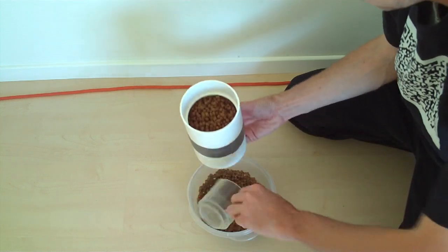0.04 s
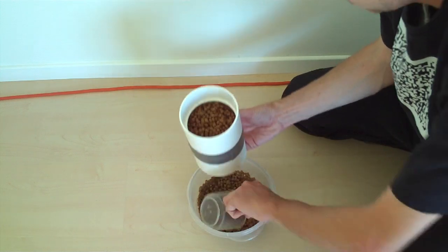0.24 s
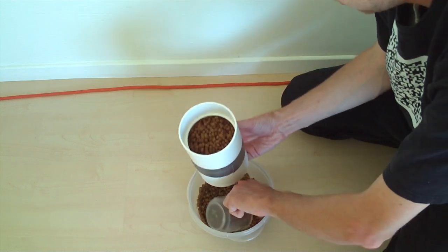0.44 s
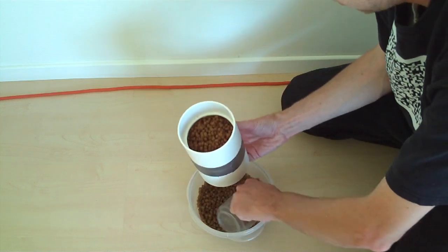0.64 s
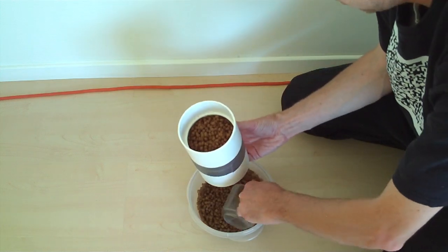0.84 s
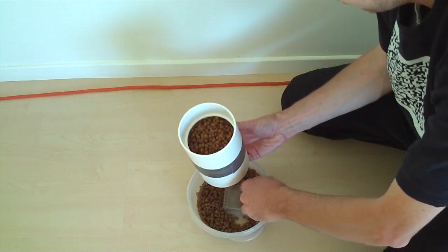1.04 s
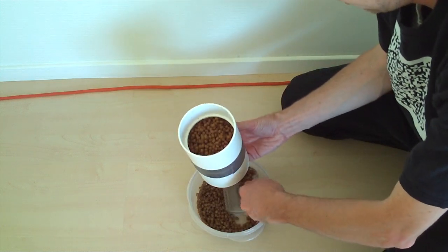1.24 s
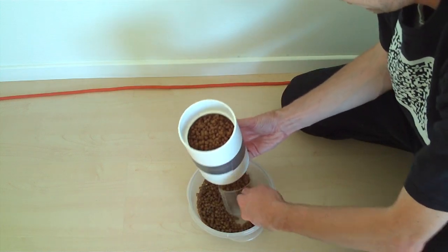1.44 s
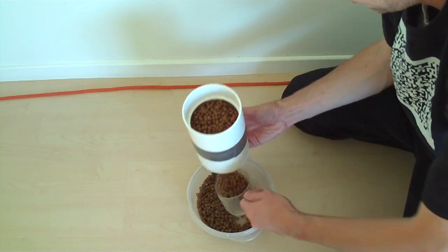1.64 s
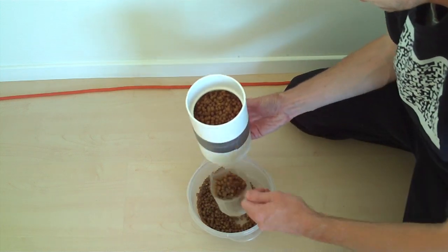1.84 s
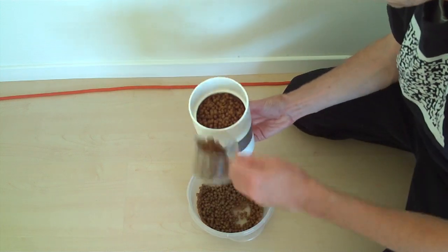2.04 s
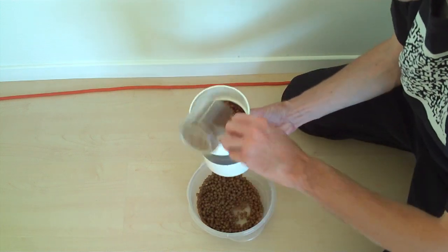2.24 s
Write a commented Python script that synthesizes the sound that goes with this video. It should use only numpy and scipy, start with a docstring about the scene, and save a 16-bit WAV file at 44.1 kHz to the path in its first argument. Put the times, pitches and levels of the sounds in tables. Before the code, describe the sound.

Dry kibble crunches and rattles as a plastic cup scoops through a plastic tub.

```python
"""Scooping dry kibble

A plastic cup knocks into a tub of kibble, digs through it in uneven pushes and is lifted out full.
Pellets crunch against each other and ring the wall modes of tub and cup, in a bare, live room.
The microphone adds a few dull low pops and has little treble."""
import sys
import numpy as np
from scipy import signal
from scipy.fft import rfft, irfft
from scipy.io import wavfile
from scipy.ndimage import map_coordinates

SR = 44100
rng = np.random.default_rng(int(sys.argv[2]) if len(sys.argv) > 2 else 0)


def file_out(sig):
    """Save sig as 16-bit WAV at sys.argv[1]."""
    # one column per channel
    cols = np.atleast_2d(sig).T
    # limit, then scale
    lim = np.clip(cols, -1, 1)
    pcm = np.round(lim * 32767).astype(np.int16)
    wavfile.write(sys.argv[1], SR, pcm)


N = 101429

# tub wall modes: f/Hz, level/dB, t60/s
TUB_MODES = [(322, -17, 0.25), (466, -4.5, 0.035), (513, -9, 0.11), (562, 1.5, 0.072), (635, -4.5, 0.061),
             (661, -2, 0.086), (730, -8.5, 0.049), (1120, -15, 0.049)]
# cup wall modes: f/Hz, level/dB, t60/s
CUP_MODES = [(806, -8.5, 0.054), (890.3, -4.5, 0.064), (995, 0, 0.027), (1114, -4, 0.039),
             (1357, -4, 0.021), (1368, -1.5, 0.047), (1483, -8.5, 0.021), (1830, -12, 0.0092),
             (2180, -14.5, 0.014)]
# pushes of the dig: t/s, tub rattle/dB, cup rattle/dB, crunch/dB, fine ticks/dB
DIG_LEVELS = [(0.0, -66, -62, -59.5, -50.5), (0.1, -66, -62, -70.5, -66), (0.207, -77.5, -58.5, -76, -79),
              (0.217, -62, -46, -41.5, -47.5), (0.255, -45.5, -42, -38, -55), (0.29, -76, -46, -45, -54.5),
              (0.345, -72, -44, -53, -54.5), (0.371, -42.5, -47.5, -35, -40.5),
              (0.399, -32.5, -31, -36, -43), (0.461, -36.5, -42.5, -38.5, -41.5),
              (0.51, -46, -40.5, -42.5, -47.5), (0.678, -47, -40, -39.5, -50.5),
              (0.719, -36.5, -36.5, -37.5, -41), (0.80, -38.5, -38, -36.5, -46.5),
              (0.869, -54, -37, -40.5, -49.5), (0.895, -34, -30.5, -34.5, -40), (0.945, -51, -44, -41, -48),
              (1.057, -40, -37, -40, -47.5), (1.074, -35.5, -27.5, -37.5, -37),
              (1.105, -57, -31.5, -37, -43.5), (1.16, -57, -37, -36, -47), (1.32, -48.5, -39, -48, -45),
              (1.43, -55.5, -48, -41.5, -50), (1.529, -51.5, -40, -36.5, -46),
              (1.61, -59, -43.5, -39.5, -46.5), (1.739, -50, -40, -44.5, -51.5),
              (1.755, -46, -35, -46.5, -44.5), (1.861, -52.5, -45.5, -47, -49), (1.97, -52, -41, -50, -53),
              (2.08, -81, -52.5, -67, -57), (2.3, -64, -54, -75, -57)]
def digging(t):
    """The push of the cup sets how hard the pellets rattle and crunch."""
    times, *levels_db = np.array(DIG_LEVELS).T
    tub, cup, crunch, ticks = (undb(np.interp(t, times, db, left=-120)) for db in levels_db)
    return (tub * rattle(TUB_MODES) + cup * rattle(CUP_MODES)
            + crunch * pellets(centre_hz=2123, spread_oct=0.72, t60_cycles=23.3, per_s=2400, scatter_db=2.5)
            + ticks * pellets(centre_hz=4027, spread_oct=0.52, t60_cycles=25, per_s=3200, scatter_db=1.0))


def rattle(modes):
    """Pellets hit a plastic wall; each lands elsewhere and rings its modes in another mix."""
    hits = contacts(per_s=1000, scatter_db=3.5)
    out = np.zeros(N)
    for hz, db, t60_s in modes:
        drive = hits * (2 * rng.random(N) - 1)
        out += undb(db) * unit(signal.fftconvolve(drive, ring(hz, t60_s))[:N])
    return unit(out)


def pellets(centre_hz, spread_oct, t60_cycles, per_s, scatter_db, sizes=16):
    """Pellets of many sizes click together, each size ringing briefly at its own pitch."""
    out = np.zeros(N)
    for offset in np.linspace(-1, 1, sizes):
        hz = centre_hz * 2 ** (offset * spread_oct)
        hits = contacts(per_s / sizes, scatter_db) * rng.choice([-1, 1], N)
        clicks = signal.fftconvolve(hits, ring(hz, t60_cycles / hz))[:N]
        out += undb(-3 * offset ** 2) * clicks
    return unit(out)


def contacts(per_s, scatter_db):
    """Random pellet contacts: many weak, a few strong."""
    strength = undb(scatter_db * np.minimum(rng.exponential(size=N), 4))
    return (rng.random(N) < per_s / SR) * strength


# empty cup modes: f/Hz, level/dB, t60/s
EMPTY_CUP_MODES = [(242, -17, 0.08), (307, -7.5, 0.065), (510, -14.5, .06), (572.4, -1, 0.12),
                   (649, -6.5, 0.089), (681, 1, 0.08), (721, -12, 0.19), (1080, -12, 0.12),
                   (1380, -24, 0.06)]
# cup on the heap: t/s, ring/dB, crack/dB
CUP_LANDINGS = [(0.212, -24, -23), (0.233, -16.5, -41)]
def landing(t):
    """The empty cup lands on the heap with a hollow ring and bounces."""
    out = np.zeros(N)
    hollow = struck(EMPTY_CUP_MODES, mode_ratio=0.97)
    for at_s, ring_db, crack_db in CUP_LANDINGS:
        add(out, at_s, undb(ring_db) * hollow + undb(crack_db) * crack(t, top_hz=1300, order=4))
    return out


# cup against tub: t/s, tub ring/dB, cup ring/dB, crack/dB
TUB_KNOCKS = [(0.451, -24.5, -25, -35), (0.5927, -25.5, -31.5, -40), (0.727, -21.5, -29, -34),
              (0.889, -26.5, -23.5, -33.5), (0.9076, -32.5, -25.5, -29.5), (0.9207, -39.5, -30, -35),
              (1.076, -29, -27, -26), (1.535, -29, -27.5, -28.5), (1.609, -46.5, -24, -30),
              (1.6458, -28, -20.5, -30), (1.744, -37, -23, -31), (1.755, -34, -20, -42),
              (1.797, -32, -26, -35), (1.856, -31.5, -28.5, -37), (1.891, -44, -25.5, -36)]
def knocks(t):
    """The buried cup strikes the tub; both ring."""
    out = np.zeros(N)
    cup = struck(CUP_MODES, mode_ratio=-1.12)
    tub = filt(struck(TUB_MODES, mode_ratio=0.78), 310, "high")
    for at_s, tub_db, cup_db, crack_db in TUB_KNOCKS:
        add(out, at_s, undb(tub_db) * tub + undb(cup_db) * cup + undb(crack_db) * crack(t, top_hz=2200))
    return out


def struck(modes, mode_ratio, contact_s=0.001):
    """A padded blow to a plastic wall, peak 1; a negative ratio swings adjacent modes in opposition."""
    wall = sum(mode_ratio ** k * undb(db) * ring(hz, t60_s) for k, (hz, db, t60_s) in enumerate(modes))
    wall *= 1 - np.exp(-np.arange(len(wall)) / SR / contact_s)
    return wall / abs(wall).max()


def crack(t, top_hz, order=2, decay_s=0.0032):
    """A short noisy contact, without bass."""
    decay = np.exp(-t[:SR // 4] / decay_s)
    return unit(filt(rng.standard_normal(len(decay)), [220, top_hz], "band", order)) * decay


# pellet snaps: t/s, f/Hz, level/dB
PELLET_SNAPS = [(0.3305, 2280, -33), (0.3719, 1590, -28.5), (0.4088, 1550, -23), (0.434, 1640, -25.5),
                (0.5754, 1490, -26.5), (0.624, 1370, -31), (0.8603, 1520, -25), (0.8934, 1560, -21),
                (0.942, 1550, -28), (0.984, 1480, -28.5), (1.037, 1450, -26.5), (1.131, 1241, -29.5),
                (1.1562, 1320, -22), (1.21, 3803, -23), (1.225, 3800, -38), (1.2499, 1843, -27),
                (1.326, 3940, -35.5), (1.378, 2060, -21.5), (1.403, 2050, -29), (1.465, 2040, -24),
                (1.587, 2310, -21.5), (1.7459, 1390, -26), (1.7806, 1570, -21), (1.8918, 1450, -23),
                (2.0078, 1420, -29.5), (2.05, 1560, -32.5), (2.0751, 1430, -30), (2.101, 5620, -39),
                (2.227, 4020, -40)]
def snaps(t):
    """Single pellets snap against the cup."""
    out = np.zeros(N)
    for at_s, hz, db in PELLET_SNAPS:
        snap = ring(hz, t60_s=0.013) + undb(-16) * crack(t, top_hz=4900)
        add(out, at_s, undb(db) * snap)
    return out


# cup jams: t/s, f/Hz, level/dB, t60/s
JAM_THUMPS = [(0.2125, 935, -25.5, 0.032), (0.392, 556, -31, 0.061), (0.5923, 538, -17, 0.021),
              (0.893, 468, -28, 0.087), (1.08, 552, -24.5, 0.056)]
def thumps():
    """The cup jams against kibble; the tighter the packing, the sooner it damps the plastic."""
    out = np.zeros(N)
    for at_s, hz, db, t60_s in JAM_THUMPS:
        add(out, at_s, undb(db) * ring(hz, t60_s))
    return out


# tub note under load: t/s, f/Hz, level/dB
TUB_GLIDE = [(0.38, 561.5, -57.5), (0.452, 535, -54.5), (0.569, 501, -56.5), (0.62, 495.9, -46.5),
             (0.68, 492.4, -37.5), (0.778, 476.8, -45), (0.849, 477, -55.5), (0.89, 463.3, -49.5),
             (0.94, 448, -61), (1.08, 435.7, -46), (1.13, 423, -69)]
def pressed_tub(t):
    """Pellets drum on the tub floor, whose note sinks as the cup presses deeper."""
    times, hz, db = np.array(TUB_GLIDE).T
    drum = rattle([(hz[0], 0, 0.1)])
    read_index = np.cumsum(np.interp(t, times, hz) / hz[0])  # slower read, lower note
    gain = undb(np.interp(t, times, db, left=-120, right=-120))
    return gain * map_coordinates(drum, [read_index], order=1, mode="mirror")


# cup rim modes: f/Hz, level/dB, t60/s
RIM_MODES = [(1985, 2, 0.018), (2160, -1.5, 0.025), (2313, 1, 0.03), (3050, -20.5, 0.035),
             (3810, -2, 0.013), (3910, -10.5, 0.053)]
def scrape(t, centre_s=1.33, half_width_s=0.48, level_db=-44):
    """Pellets trapped under the rim ring it as it slides along the tub floor."""
    swell = np.exp(-((t - centre_s) / half_width_s) ** 2)
    return undb(level_db) * swell * rattle(RIM_MODES)


# full cup modes: f/Hz, level/dB, t60/s
FULL_CUP_MODES = [(506, -8, 0.16), (624, -7, 0.074), (666, -6, 0.073), (726, -6, 0.088), (861, -0.5, 0.24),
                  (1147, -8.5, 0.053), (1383, -1, 0.053)]
def settling(t, lift_s=1.745, rise_s=0.064, level_db=-36.5):
    """The full cup rings more as it comes free of the heap, then fades as its load settles."""
    age = np.maximum(t - lift_s, 0) / rise_s
    return undb(level_db) * age * np.exp(1 - age) * rattle(FULL_CUP_MODES)


def room(x, t, low_t60_s=0.83, treble_t60_s=0.41, wet_db=-3, gap_s=0.0037, places=14):
    """Hard floor and bare walls return a dense tail, a new one for each place the cup passes."""
    wet, age_s = np.zeros(N), t[:SR]
    for span in np.array_split(np.arange(N), places):
        noise = rng.standard_normal(SR)
        low = filt(noise, 1300, "low", order=1)
        tail = low * undb(-60 * age_s / low_t60_s) + (noise - low) * undb(-60 * age_s / treble_t60_s)
        tail *= age_s > gap_s
        add(wet, t[span[0]], signal.fftconvolve(x[span], tail / np.linalg.norm(tail)))
    return (x + undb(wet_db) * wet) / np.hypot(1, undb(wet_db))


# pressure steps: t/s, signed step/full scale
MIC_POPS = [(0.399, -0.051), (0.5338, 0.051), (0.5953, -0.05), (0.6992, 0.054), (0.731, -0.052),
            (1.364, 0.053), (1.6491, -0.056), (1.6892, 0.058)]
def pops(t, leak_s=0.044):
    """Dull pops at the microphone: sudden pressure steps that leak away."""
    out = np.zeros(N)
    for at_s, step in MIC_POPS:
        add(out, at_s, step * np.exp(-t / leak_s))
    return filt(out, 1200, "low", order=1)


# noise floor spectrum: f/Hz, relative density/dB
FLOOR_SPECTRUM = [(25, -2.5), (60, -1.5), (120, -1), (170, -3.5), (310, -1), (420, -5.5), (620, -8),
                  (900, -13.5), (1800, -16.5), (3300, -23.5), (4200, -18), (5500, -36.5), (7500, -31.5)]
def background(level_db=-46.5):
    """Steady low room noise and faint microphone hiss."""
    hz, db = np.array(FLOOR_SPECTRUM).T
    bins_hz = np.maximum(np.fft.rfftfreq(N, 1 / SR), 1)
    shape = undb(np.interp(np.log(bins_hz), np.log(hz), db))
    return undb(level_db) * unit(irfft(rfft(rng.standard_normal(N)) * shape, N))


def ring(hz, t60_s):
    """One struck mode, dying away."""
    t = np.arange(SR // 4) / SR
    return np.sin(2 * np.pi * hz * t) * np.exp(-np.log(1000) * t / t60_s)


def undb(db):
    """Decibels to gain."""
    return 10 ** (np.asarray(db) / 20)


def unit(x):
    """Scale to rms 1."""
    return x / np.sqrt(np.mean(x ** 2))


def filt(x, hz, kind, order=2):
    """Butterworth filter."""
    return signal.sosfilt(signal.butter(order, hz, kind, fs=SR, output="sos"), x)


def add(out, at_s, sound):
    """Mix a sound in at a given time."""
    start = int(at_s * SR)
    out[start:start + len(sound)] += sound[:max(N - start, 0)]


def scene():
    """One scoop in the room, with pops and a quiet noise floor."""
    t = np.arange(N) / SR
    rattles = digging(t) + pressed_tub(t) + scrape(t) + settling(t)
    impacts = landing(t) + knocks(t) + snaps(t) + thumps()
    return (room(rattles + impacts, t) + pops(t) + background())[None]


def record(dry):
    """Narrow-band microphone: the treble rolls off, then is cut."""
    rolloff_hz, cutoff_hz = 6500, 7350
    soft = filt(dry, rolloff_hz, "low", order=10)
    return signal.sosfilt(signal.ellip(10, .2, 80, cutoff_hz, fs=SR, output="sos"), soft)


dry = scene()
out = record(dry)
file_out(out)
```